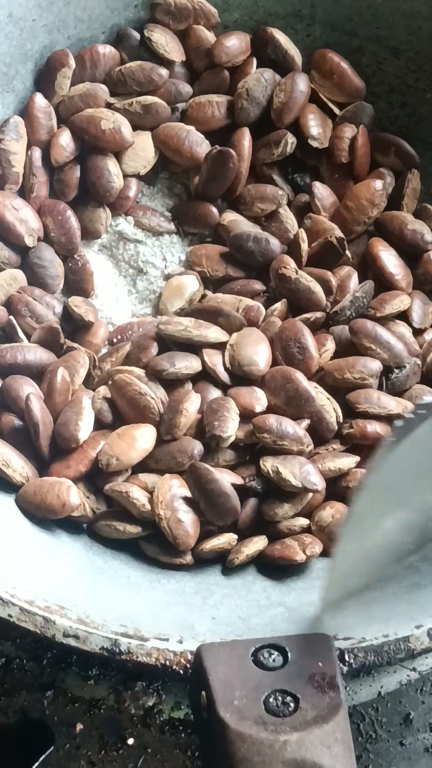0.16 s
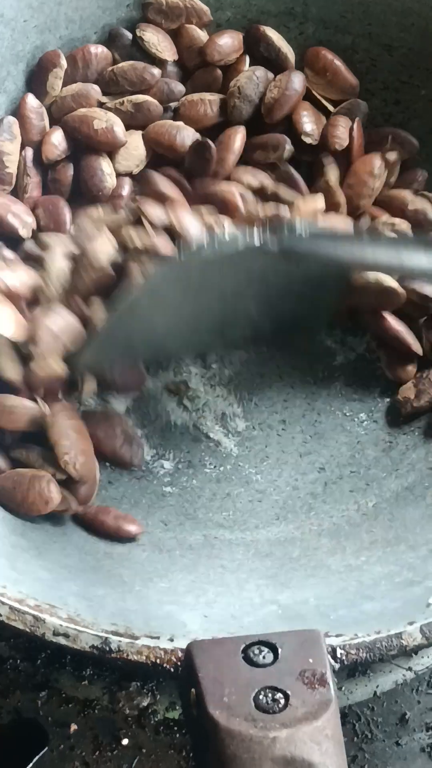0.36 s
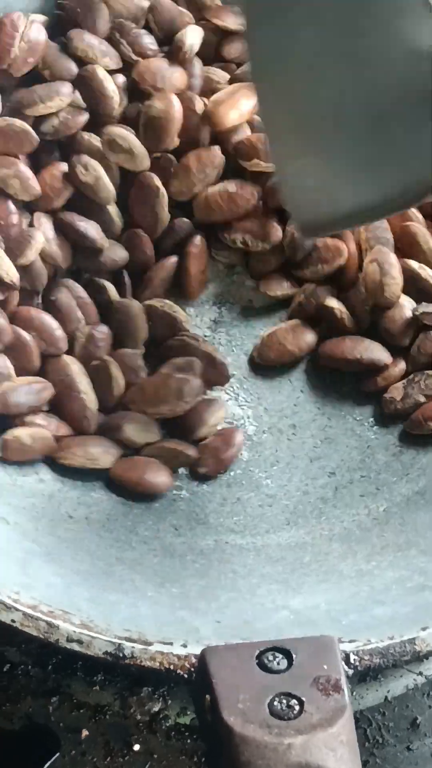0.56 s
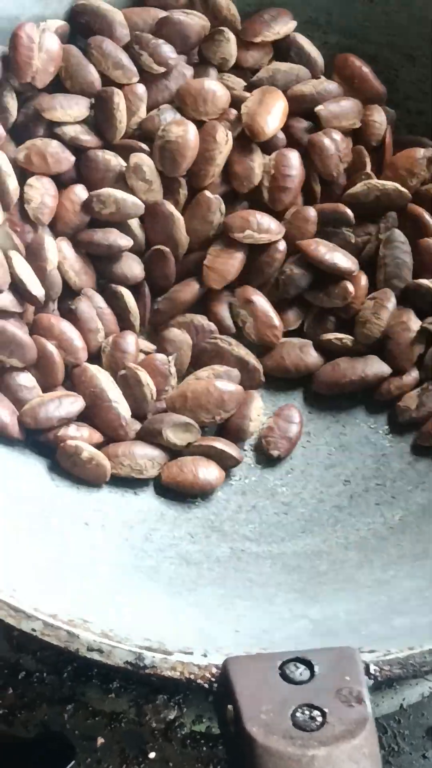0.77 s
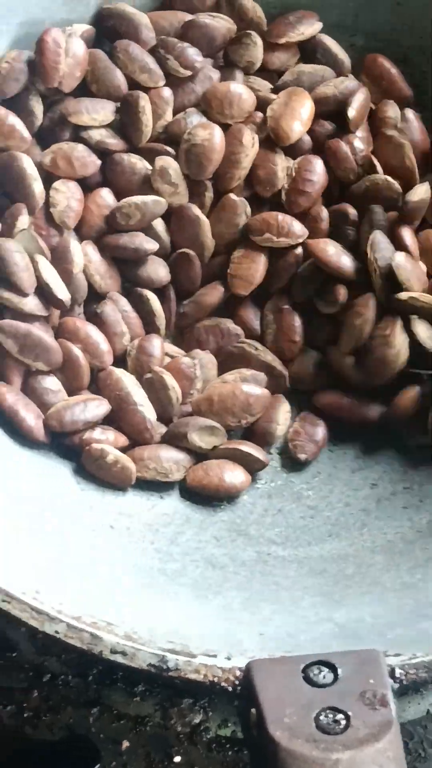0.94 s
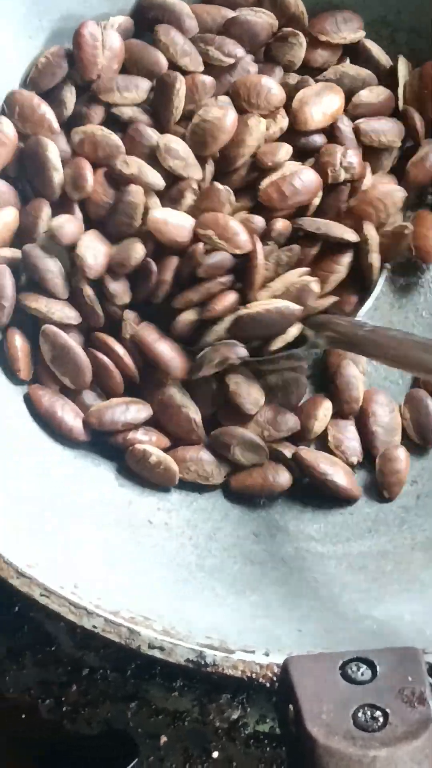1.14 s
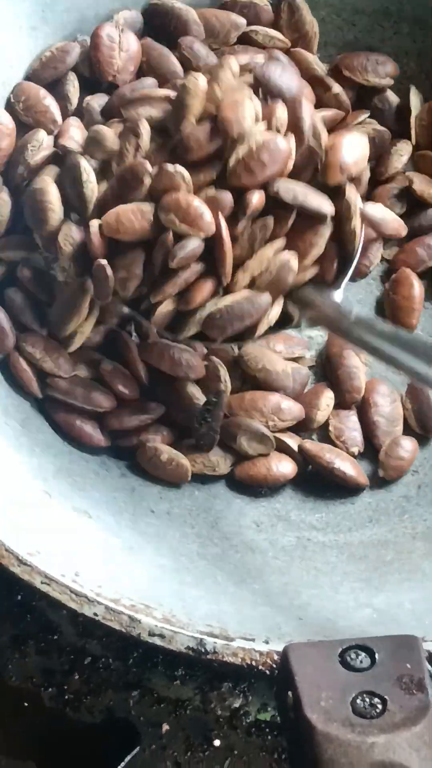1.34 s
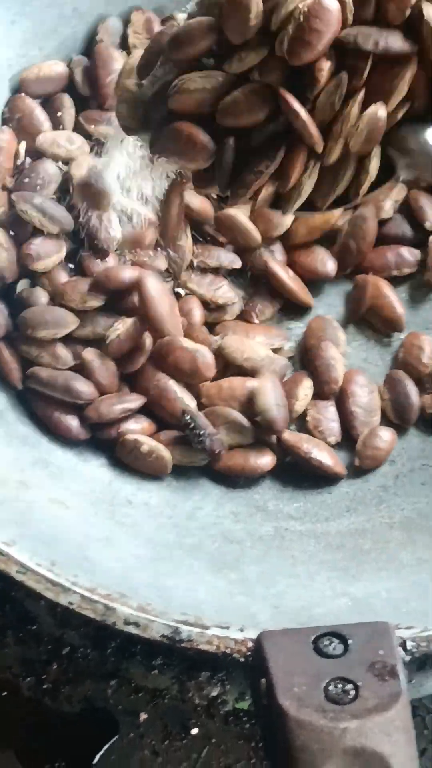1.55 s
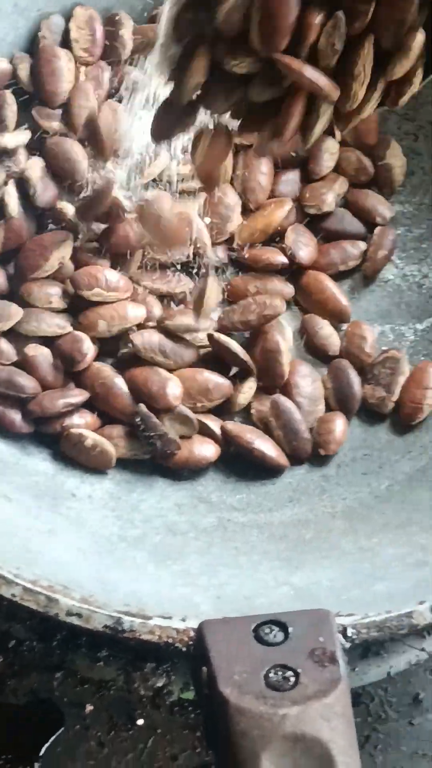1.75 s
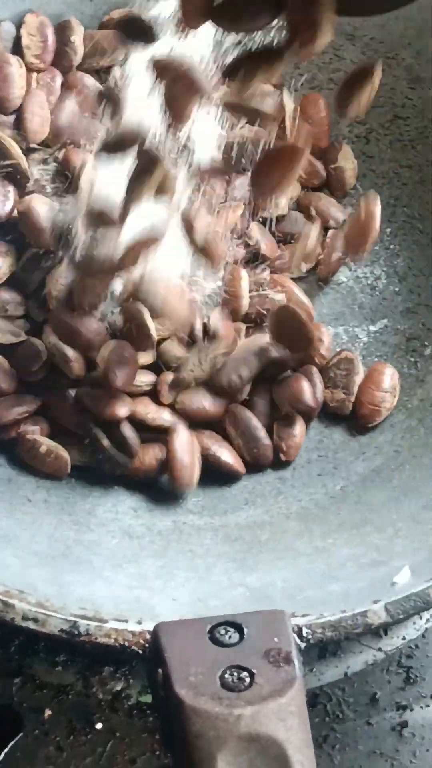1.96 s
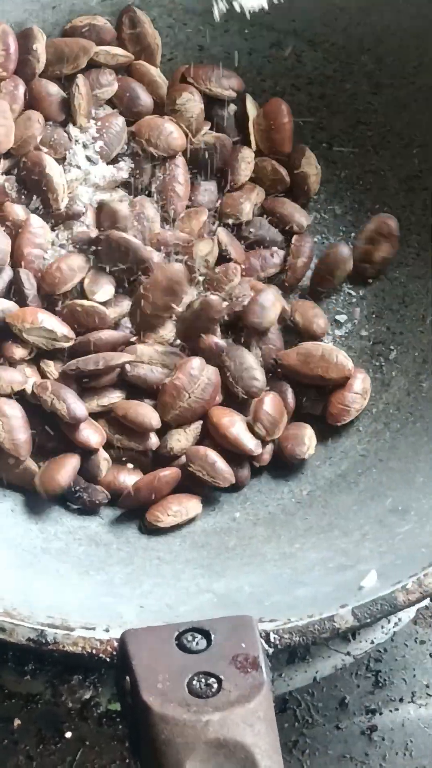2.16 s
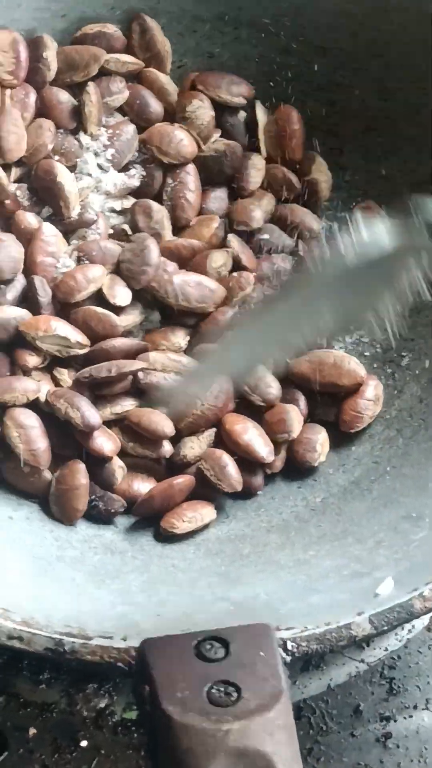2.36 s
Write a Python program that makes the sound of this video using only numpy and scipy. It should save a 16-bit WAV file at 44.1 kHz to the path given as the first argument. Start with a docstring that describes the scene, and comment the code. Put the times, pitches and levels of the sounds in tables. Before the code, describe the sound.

A steel spatula clanks into a metal pan and scrapes with a falling squeal, seeds rattle briefly, a second scrape sings lower, then lifted seeds knock and pour back. Close microphone, quiet kitchen with low hum.

```python
"""Hard seeds dry-roast in a metal pan, close by, over a low hum, air noise and a faint ticking sizzle.
A steel spatula clanks down (modal ringing) and scrapes (stick-slip noise through resonances); its blade sings,
mostly falling in pitch, and a few seeds rattle. It clanks and scrapes again, the blade singing lower as it
comes free. Then lifted seeds knock on the blade (damped modes) and pour back in a rattle of random impacts."""
import sys
import numpy as np
from scipy import signal
from scipy.fft import rfft, irfft, next_fast_len
from scipy.io import wavfile
from scipy.ndimage import map_coordinates

SR = 44100
rng = np.random.default_rng(int(sys.argv[2]) if len(sys.argv) > 2 else 0)


def transcribe(signal):
    """Save signal, clipped to [-1, 1], as a 16-bit WAV file at the path in sys.argv[1]."""
    frames = np.atleast_2d(signal).T
    limited = np.clip(frames, -1, 1)
    pcm = np.round(limited * 32767).astype(np.int16)
    wavfile.write(sys.argv[1], SR, pcm)


N = 110250  # samples


# Levels in the tables are relative: the gains of each function apply on top.
def amp(db):
    """Definition of the decibel: level to amplitude ratio."""
    return 10 ** (np.asarray(db) / 20)


def unit(x):
    """Normalisation to a root-mean-square of 1."""
    return x / np.sqrt(np.mean(x ** 2) + 1e-20)


def curve(s, values, outside=-120):
    """Linear interpolation between points in time, one value per sample."""
    return np.interp(np.arange(N) / SR, s, values, left=outside, right=outside)


def wobble(rate):
    """Band-limited random modulation: a smooth curve through random knots, rate of them a second."""
    knots = rng.standard_normal(int(N * rate / SR) + 4)
    return map_coordinates(knots, [np.arange(N) * rate / SR])


def add(track, s, sound):
    """Superposition: a sound is summed into the track from a given time [s]."""
    i = max(0, round(s * SR))
    track[i:i + len(sound)] += sound[:max(0, N - i)]


def coloured(x, colour, peaks=()):
    """Minimum-phase filtering: a causal, unit-energy response from a (Hz, dB) contour plus resonances."""
    size = 2 ** 14
    hz = np.fft.rfftfreq(size, 1 / SR)
    points_hz, points_db = np.transpose(colour)
    db = np.interp(np.log(hz + 1), np.log(points_hz), points_db)
    for centre, width, lift in peaks:
        db = db + lift / (1 + ((hz - centre) / width) ** 2)
    # folding the cepstrum onto positive times makes the response minimum-phase
    cepstrum = irfft(np.log(amp(db)))[:size // 2]
    cepstrum[1:] *= 2
    response = irfft(np.exp(rfft(cepstrum, size)))[:size // 2]
    return signal.oaconvolve(x, response / np.linalg.norm(response))[:N]


def contacts(rate, scatter_db, hiss):
    """Random impact excitation: tiny uneven hits of rms 1, plus rubbing noise of rms hiss."""
    hit = rng.random(N) < rate / SR
    sign = np.sign(rng.standard_normal(N))
    size = amp(scatter_db * np.clip(rng.standard_normal(N), -2, 2)) * sign
    return unit(hit * size) + hiss * rng.standard_normal(N)


def shimmer(x, t60, wet):
    """Dense reverberation: convolution with exponentially decaying noise, energy about kept."""
    t = np.arange(SR // 5) / SR
    tail = rng.standard_normal(len(t)) * amp(-60 * t / t60)
    reverberant = signal.fftconvolve(x, tail / np.linalg.norm(tail))[:N]
    return (x + wet * reverberant) / np.hypot(1, wet)


SHIFT_DB, SHIFT_HZ, SHIFT_S = 3.3, 169.8, 0.04  # depth, width and life of a passing resonance


def shifting(x):
    """Time-varying resonance: spectral peaks come and go as the contact point and load of seeds move."""
    hz, t, z = signal.stft(x, SR, nperseg=512)
    knots = rng.standard_normal((int(hz[-1] / SHIFT_HZ) + 2, int(t[-1] / SHIFT_S) + 2))
    grid = np.meshgrid(hz / SHIFT_HZ, t / SHIFT_S, indexing="ij")
    field = map_coordinates(np.clip(knots, -2, 2), grid)
    return signal.istft(z * unit(amp(SHIFT_DB * field)), SR, nperseg=512)[1][:N]


def swells(rows, waver, flutter_db):
    """Frequency and amplitude modulation: short wavering tones under Gaussian envelopes."""
    out, t = np.zeros(N), np.arange(N) / SR
    for s, length, hz, db in rows:
        phase = 2 * np.pi * np.cumsum(hz * (1 + waver * wobble(260))) / SR
        tone = unit(np.sin(phase) * amp(flutter_db * wobble(200)))
        out += amp(db) * np.exp(-((t - s) / length) ** 2) * tone
    return out


# spectrum of the kitchen air: (frequency [Hz], level [dB])
AIR_COLOUR = [(55, -9), (85, -2), (120, -7.5), (220, -2.5), (500, -17), (1000, -5.5), (3000, -16.5),
              (10500, -16.5), (13000, -21), (15500, -33)]
# level of the hum: (time [s], level [dB])
HUM = [(0, -79), (1.15, -73.5), (1.3, -65), (1.5, -76.5), (2.5, -89)]
AIR_DB, HUM_HZ = -66.5, 89.6


def background():
    """Stationary noise and a modulated tone: kitchen air and a wavering low hum."""
    air = amp(AIR_DB) * unit(coloured(rng.standard_normal(N), AIR_COLOUR))
    hum_db = curve(*np.transpose(HUM)) + 3 * wobble(22)
    phase = 2 * np.pi * np.cumsum(HUM_HZ + 4 * wobble(23.86)) / SR
    return air + amp(hum_db) * unit(np.sin(phase))


# hot husks crack, tiny and bright: (time [s], level [dB])
POPS = [(1.259, -27.5), (1.3157, -42.5), (1.5375, -42), (1.6975, -48), (1.7224, -41)]
# spectrum of a cracking husk: (frequency [Hz], level [dB])
POP_COLOUR = [(1500, -41), (4500, 2), (8000, -9), (10500, -1), (12500, -26.5), (15500, -28)]
POP_T60 = 0.011  # s


def pops():
    """Impulsive radiation: hot husks crack as decaying noise, over a faint steady ticking."""
    out, t = np.zeros(N), np.arange(SR // 20) / SR
    for s, db in POPS:
        add(out, s, rng.standard_normal(len(t)) * amp(db - 60 * t / POP_T60))
    ticking = amp(-71) * contacts(rate=180, scatter_db=-1, hiss=0.1)
    return coloured(out + ticking, POP_COLOUR)


# light touches on the steel: (time [s], pitch [Hz], level [dB], 60 dB decay time [s])
TOUCHES = [(0, 2090, -41.5, 0.098), (0, 4350, -48.5, 0.28), (0.911, 4330, -31, 0.26),
           (1.654, 4250, -26.5, 0.054), (2.368, 984, -64, 1)]


def touches():
    """Free vibration: light touches leave single modes of the steel ringing, decaying exponentially."""
    out, t = np.zeros(N), np.arange(SR // 3) / SR
    for s, hz, db, t60 in TOUCHES:
        envelope = amp(db - 60 * t / t60 + 1.1 * wobble(163)[:len(t)])
        onset = 1 - np.exp(-t / 0.00098)
        add(out, s, envelope * onset * np.sin(2 * np.pi * hz * t))
    return out


# thin squeals of the edge: (time [s], length [s], pitch [Hz], level [dB])
SQUEALS = [(0.325, .018, 8300, -53), (0.402, 0.021, 8500, -36), (0.485, 0.024, 8960, -42)]


def squeals():
    """Friction-driven oscillation: the edge squeals thinly, its pitch nearly steady."""
    return swells(SQUEALS, waver=0.0061, flutter_db=1)


# booms of the pan under the push: (time [s], length [s], pitch [Hz], level [dB])
BOOMS = [(0.262, 0.031, 215, -42.5), (0.391, 0.017, 230, -49), (0.393, 0.0057, 470, -29),
         (0.885, 0.024, 239, -44.5), (0.944, 0.044, 220.7, -44.5), (2.125, 0.036, 232.6, -59)]


def booms():
    """Forced low resonance: the pan booms under the push, its pitch wavering widely."""
    return swells(BOOMS, waver=0.17, flutter_db=2.5)


# the blade's song, one list a phrase: (time [s], pitch [Hz], level [dB])
SINGS = [
    [(0.314, 2293, -35), (0.321, 2200, -11), (0.329, 2183, -24), (0.336, 2104, -15.5), (0.349, 2290, -47)],
    [(0.42, 2600, -34), (0.46, 2350, -27), (0.485, 2000, -17), (0.51, 1850, -20.5), (0.54, 1750, -38.5),
     (0.71, 1720, -51), (0.74, 1750, -64)],
    [(0.962, 2012, -45), (0.975, 2054, -21.5), (0.987, 2040, -51), (1.04, 2008, -22.5), (1.077, 1903, -16),
     (1.087, 1831, -25), (1.105, 1787, -12), (1.117, 1766, -16), (1.17, 1774, -39), (1.26, 1730, -30),
     (1.3, 1770, -51)],
]
# modes of the blade, lowest first: (frequency [Hz], level [dB], time to peak [s])
BLADE = [(1755, -1, 0.0093), (1937, -13, 0.0088), (2498, -11, 0.0077), (2676, -15, 0.0032),
         (4320, -21, 0.003)]


def singing():
    """Friction-driven mode: the blade mostly sinks towards its free pitch, steadier the nearer it gets."""
    out, free_hz = np.zeros(N), BLADE[0][0]
    for rows in SINGS:
        s, hz, db = np.transpose(rows)
        pitch = curve(s, hz, outside=free_hz)
        waver_hz = 55 + 0.266 * np.abs(pitch - free_hz)
        phase = 2 * np.pi * np.cumsum(pitch + waver_hz * wobble(520)) / SR
        out += amp(curve(s, db)) * unit(np.sin(phase) * amp(2.0 * wobble(260)))
    return amp(-4.5) * out


# modes of a husk: (nominal ratio to its pitch, level [dB], 60 dB decay time [s])
HUSK_MODES = [(1.001, 1.5, 0.025), (1.17, -10.5, 0.027), (1.45, -10, 0.009), (1.68, -9.5, 0.0094)]


def husk(hz):
    """Modal synthesis: one seed's brief ring, its mode ratios slightly random."""
    out, t = 0, np.arange(SR // 40) / SR
    for ratio, db, t60 in HUSK_MODES:
        mode_hz = hz * ratio * np.exp(rng.normal(0, 0.034))
        out = out + amp(db - 60 * t / t60) * np.sin(2 * np.pi * mode_hz * t)
    return out


# single sharp seed clicks: (time [s], level [dB], pitch [Hz])
CLICKS = [(0.5336, -21, 4400), (0.547, -16.5, 3770), (0.551, -19.5, 4180), (0.574, -24, 4630),
          (0.606, -18, 3570), (0.6285, -25, 4280), (1.642, -30, 4300), (1.7868, -33.5, 3700),
          (1.8883, -20, 3550), (1.969, -22.5, 4200), (1.983, -22.5, 3760), (2.0319, -15.5, 4300),
          (2.065, -12.5, 4230), (2.1114, -23, 3500), (2.1714, -6, 4280), (2.1862, -13.5, 3660)]
# spectrum of husks struck together or on metal: (frequency [Hz], level [dB])
HUSK_COLOUR = [(200, -47), (1500, -22), (2500, -19.5), (3050, -9), (3500, 2.5), (3900, -2), (4300, 6.5),
               (4900, -9.5), (5650, -12.5), (6100, -4.5), (6600, -27), (7300, -14), (8200, -38.5),
               (10500, -15.5), (13000, -48), (15500, -25)]
# what so small a shell radiates: (frequency [Hz], level [dB])
HUSK_BAND = [(300, -58), (1300, -26), (2500, 5.5), (3050, -7.5), (3550, 0.5), (6200, -3.5), (8500, -6.5),
             (13000, -9)]
SNAP_DB, SNAP_T60, CLICK_RING_DB = -13.5, 0.014, -13.5  # T60 in s


def clicks():
    """Impact excitation: one hard husk snaps against metal, a noise burst with the husk's own modes."""
    snap, ring, t = np.zeros(N), np.zeros(N), np.arange(SR // 20) / SR
    for s, db, hz in CLICKS:
        add(snap, s, rng.standard_normal(len(t)) * amp(db + SNAP_DB - 60 * t / SNAP_T60))
        add(ring, s, amp(db + CLICK_RING_DB) * husk(hz))
    return coloured(snap, HUSK_COLOUR, [(6600, 1900, 20.0)]) + coloured(ring, HUSK_BAND)


# seeds knock on the blade: (time [s], level [dB], lift of the upper modes [dB])
KNOCKS = [(1.3139, -23.5, -7), (1.3231, -22, 4.5), (1.3516, -27, 4), (1.374, -30, -20), (1.401, -28, 9),
          (1.414, -27, -1), (1.4725, -26.5, -10), (1.526, -23.5, 3), (1.5378, -19.5, 6.5),
          (1.5706, -18.5, 1), (1.5908, -20.5, 1.5), (1.632, -22.5, 3.5), (1.662, -20, 1), (1.674, -21, -9),
          (1.837, -14.5, -2), (1.9083, -16, 6.5), (1.9298, -15.5, -20), (1.9478, -19, 3),
          (2.0611, -17, 8.5), (2.2219, -26.5, -1), (2.234, -29.5, -17)]
KNOCK_DB = -4
LOW_MODES_HZ = 2250  # border between low and upper modes


def knocks():
    """Damped modal response: modes swell and die at once under the load; the landing place sets brightness."""
    out, t = np.zeros(N), np.arange(SR // 10) / SR
    for s, db, lift_db in KNOCKS:
        for hz, mode_db, swell in BLADE:
            u = t / swell
            envelope = (u * np.exp(1 - u)) ** 3  # peaks at 1 when t = swell
            mode_hz = hz * (1 + rng.normal(0, 0.013))
            tone = np.sin(2 * np.pi * (mode_hz * t + rng.random()))
            level_db = db + KNOCK_DB + mode_db + lift_db * (hz > LOW_MODES_HZ)
            add(out, s, amp(level_db) * envelope * tone)
    return out


CLACKS_PER_S, CLACK_HZ, CLACK_SPREAD, CLACK_SCATTER_DB = 290, 3408, 0.22, 4  # spread in log pitch


def clacks():
    """Random superposition: separate seeds collide, each with its own pitch and size, rms 1."""
    out, step = np.zeros(N), 1 / CLACKS_PER_S
    draws = np.clip(rng.standard_normal((int(N / SR / step), 3)), -2, 2)
    for k, (when, pitch, size) in enumerate(draws):
        hz = CLACK_HZ * np.exp(CLACK_SPREAD * pitch)
        add(out, (k + when) * step, amp(CLACK_SCATTER_DB * size) * husk(hz))
    return unit(coloured(shimmer(out, t60=0.035, wet=0.3), HUSK_BAND))


# tumbling seeds: (time [s], blade ring level [dB], husk click level [dB], level of the pan under them [dB])
TUMBLE = [(0, -57, -55.5, -63.5), (0.16, -68, -64.5, -66), (0.49, -41, -30, -61),
          (0.535, -41.5, -41, -48.5), (0.62, -37.5, -34, -56.5), (0.7, -50, -55.5, -67.5),
          (0.82, -65.5, -58.5, -61), (1.3, -51.5, -59, -62), (1.43, -44.5, -49.5, -62),
          (1.51, -49.5, -50.5, -59.5), (1.55, -33.5, -48.5, -57.5), (1.68, -42, -49.5, -53.5),
          (1.74, -49.5, -53.5, -64), (1.822, -60, -52.5, -61), (1.87, -40, -39, -56),
          (1.97, -36, -38.5, -58), (2.02, -27.5, -30.5, -44.5), (2.13, -36.5, -30.5, -38.5),
          (2.235, -36, -39, -52), (2.263, -61, -51.5, -63), (2.37, -59.5, -63.5, -72)]
# spectrum of the ringing blade: (frequency [Hz], level [dB])
BLADE_COLOUR = [(1200, -51.5), (1620, -19.5), (1755, 2.5), (1850, -12.5), (1950, -5.5), (2150, -14),
                (2350, -14), (2490, -3.5), (2600, -16.5), (2800, -19.5), (3100, -37), (4000, -45),
                (9000, -63)]
# spectrum of the pan's low body: (frequency [Hz], level [dB])
BODY_COLOUR = [(40, -73), (110, -29), (320, -18.5), (400, -0.5), (490, 2), (570, -2.5), (720, -5),
               (900, -3), (1150, -2), (1320, -5), (1550, 3), (1900, -8), (3000, -66.5)]
RING_TUMBLE_DB, HUSK_DB, PAN_TUMBLE_DB, CLACK_DB = 0.5, -3.5, -4, -3


def tumbling():
    """Source-filter principle: collisions of many seeds excite the blade, the husks and the pan."""
    s, *levels = np.transpose(TUMBLE)
    ring, husks, pan = [amp(curve(s, db, outside=-66)) for db in levels]
    impacts = contacts(rate=650, scatter_db=1.5, hiss=0.22)
    force = unit(shifting(shimmer(impacts, t60=0.043, wet=0.77)))
    out = coloured(force * ring * amp(RING_TUMBLE_DB), BLADE_COLOUR)
    out += coloured(force * husks * amp(HUSK_DB), HUSK_COLOUR)
    out += coloured(force * pan * amp(PAN_TUMBLE_DB), BODY_COLOUR, [(472, 48, 3.8)])
    return out + husks * amp(CLACK_DB) * clacks()


# two strokes: (time [s], pressure as steel level [dB], pan's low body level [dB], treble level [dB])
STROKE_1 = [(0.225, -35, -25, -31), (0.237, -38.5, -42.5, -70), (0.277, -33.5, -29.5, -51),
            (0.335, -30.5, -33, -46), (0.362, -26.5, -23.5, -42), (0.395, -25.5, -22.5, -39),
            (0.449, -23.5, -31, -38), (0.489, -31, -34.5, -44), (0.543, -38, -47.5, -65),
            (0.654, -48.5, -48, -89), (0.715, -65, -68, -82)]
STROKE_2 = [(0.892, -49, -42, -64), (0.918, -50, -35, -56), (0.95, -40, -39, -43.5),
            (0.984, -22.5, -32, -28.5), (1.036, -28, -32.5, -33.5), (1.05, -27, -44.5, -38),
            (1.142, -26.5, -34.5, -33), (1.16, -25, -36.5, -30), (1.221, -28.5, -36.5, -39.5),
            (1.258, -41.5, -47.5, -46), (1.3, -59, -82, -91)]
# spectra of the scraped steel and of its treble: (frequency [Hz], level [dB])
STEEL_COLOUR = [(200, -50), (1300, -29.5), (1650, -8), (1750, -1), (2150, 1.5), (2380, 1.5), (2620, 2.5),
                (2950, -7.5), (3200, -11.5), (3550, 0), (4350, 1), (4800, -1.5), (5600, -5.5), (6150, -6),
                (6700, -9), (8000, -14.5), (9500, -46), (12000, -73)]
TREBLE_COLOUR = [(6000, -20), (8500, -4), (9500, -4.5), (10600, 4), (11500, -3.5), (12500, -18),
                 (13700, -13), (14800, -7), (15800, -9.5)]
# narrow resonances of the pan: (frequency [Hz], width [Hz], lift [dB])
PAN = [(233, 13, 0.5), (480, 22, 1.5), (729, 9.3, 9), (816, 26, 6), (1012, 14, 4), (1157, 24, 4.5),
       (1740, 36, 9), (1623, 62, -7.5), (2193, 30, 4), (2598, 28, 9), (4327, 61, 8.5), (6027, 49, 7)]
SLIPS_PER_S, STEEL_DB, BODY_DB, TREBLE_DB = 900, 1.5, -3, 1


def scrapes():
    """Stick-slip friction: the edge jerks unevenly over the pan, shaking blade and bowl."""
    first, second = np.transpose(STROKE_1), np.transpose(STROKE_2)
    steel, body, treble = [amp(curve(first[0], a)) + amp(curve(second[0], b))
                           for a, b in zip(first[1:], second[1:])]
    slips = contacts(SLIPS_PER_S, scatter_db=1.5, hiss=0.3) * amp(1.1 * wobble(220))
    force = unit(shifting(shimmer(slips, t60=0.043, wet=0.44)))
    out = coloured(force * steel * amp(STEEL_DB), STEEL_COLOUR, PAN)
    out += coloured(force * body * amp(BODY_DB), BODY_COLOUR, PAN)
    return out + coloured(force * treble * amp(TREBLE_DB), TREBLE_COLOUR)


# spatula hits the pan: (time [s], level [dB], weight of the low modes [dB])
CLANKS = [(0.189, -10, 1), (0.1942, -11.5, 1), (0.2071, -7.5, -1.5), (0.2143, -23, 9), (0.2516, -21.5, 7),
          (0.3138, -17, 3), (0.843, -8, -10.5), (0.9085, -21.5, -6)]
# spectrum of the crack and wash: (frequency [Hz], level [dB])
CLANK_COLOUR = [(40, -57), (150, -38), (330, -27), (440, -4), (640, -19.5), (1100, -6.5), (1400, -8),
                (2050, -2), (2320, -11), (2580, -9.5), (2920, -22), (3600, -5.5), (4300, 1.5),
                (4800, -10.5), (6200, -8.5), (9300, -21.5), (10500, -12), (12800, -28.5), (15000, -24)]
# clear modes of a hit: (frequency [Hz], nominal level [dB], 60 dB decay time [s])
CLANK_MODES = [(1047, -9.5, 0.22), (1145, -5, 0.095), (2084, -9, 0.091), (2587, 2.5, 0.11),
               (3880, -6, 0.15), (4325, 5.5, 0.044), (4420, 1, 0.09), (6180, -13, 0.097)]
CRACK_DB, CRACK_T60, WASH_DB, WASH_T60, RING_DB = -10, 0.027, -12.5, 0.14, -14.5  # T60 in s


def clanks():
    """Modal excitation by impact: a crack, a dense wash and clear modes; a glancing hit stirs less low wash."""
    dense, ring, t = np.zeros(N), np.zeros(N), np.arange(SR // 4) / SR
    lowpass = signal.butter(2, LOW_MODES_HZ, fs=SR, output="sos")
    onset = 1 - np.exp(-t / 0.0031)
    for s, db, weight_db in CLANKS:
        noise = rng.standard_normal(len(t))
        noise = noise + (amp(weight_db) - 1) * signal.sosfiltfilt(lowpass, noise)
        crack = amp(db + CRACK_DB - 60 * t / CRACK_T60)
        wash = amp(db + WASH_DB - 60 * t / WASH_T60)
        add(dense, s, noise * (crack + wash))
        modes = np.zeros(len(t))
        for hz, mode_db, t60 in CLANK_MODES:
            envelope = amp(mode_db + rng.normal(0, 2.44) - 60 * t / t60)
            modes += envelope * np.sin(2 * np.pi * (hz * t + rng.random()))
        add(ring, s, amp(db + RING_DB) * modes * onset)
    return coloured(dense, CLANK_COLOUR) + ring


def scene():
    """Superposition of all sources in the pan, with a trace of the kitchen's echo, over the background."""
    seeds = pops() + clicks() + knocks() + tumbling()
    steel = touches() + squeals() + booms() + singing() + scrapes() + clanks()
    return (background() + shimmer(seeds + steel, t60=0.24, wet=0.093))[None]


TOP_HZ = 15900  # band limit


def record(dry):
    """Band limitation: a sharp spectral cut removes everything from the limit upwards."""
    m = next_fast_len(N + SR // 2)
    passed = np.fft.rfftfreq(m, 1 / SR) < TOP_HZ
    return irfft(rfft(dry, m) * passed, m)[..., :N]


dry = scene()
out = record(dry)
transcribe(out)
```